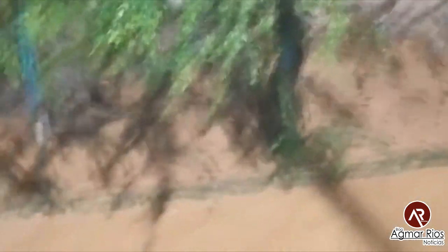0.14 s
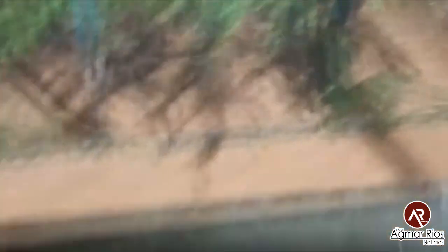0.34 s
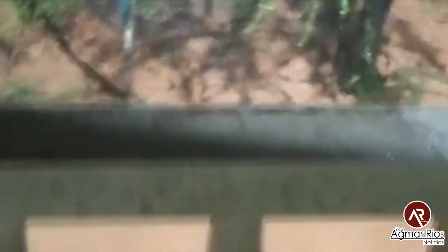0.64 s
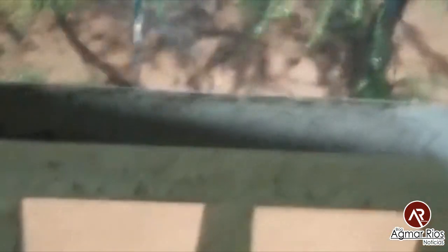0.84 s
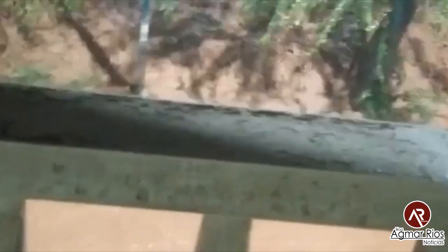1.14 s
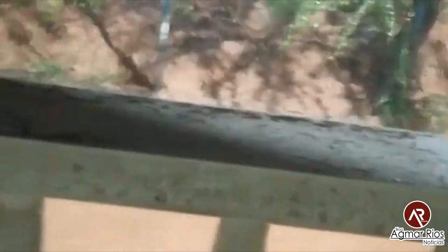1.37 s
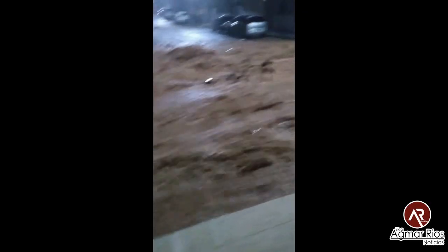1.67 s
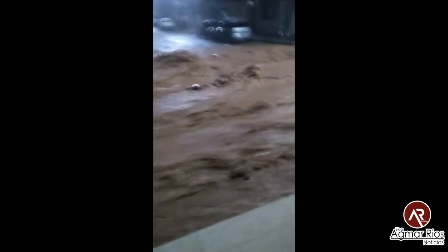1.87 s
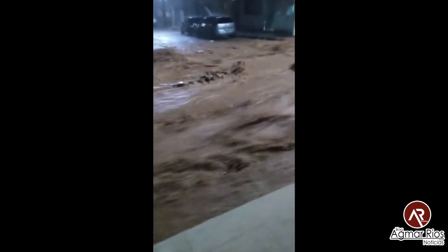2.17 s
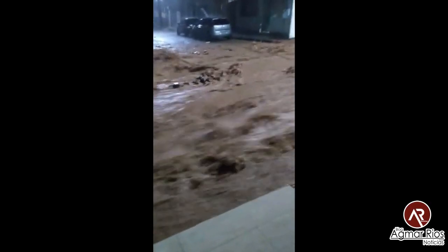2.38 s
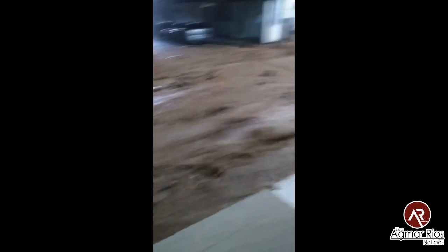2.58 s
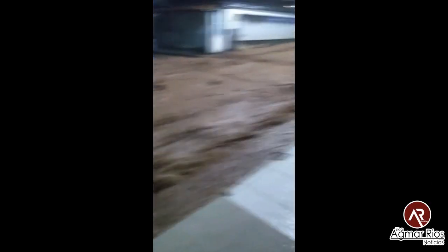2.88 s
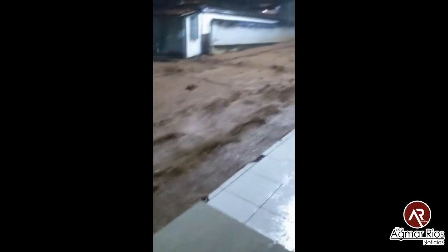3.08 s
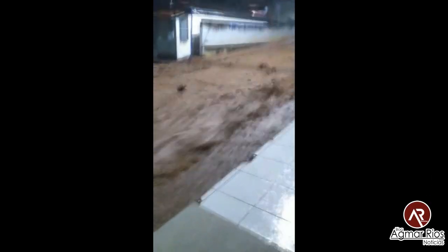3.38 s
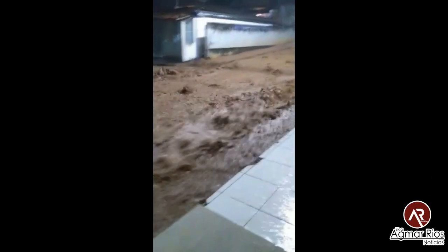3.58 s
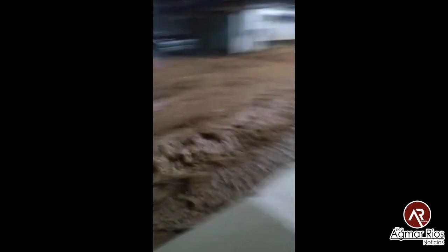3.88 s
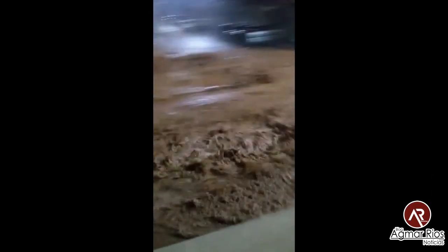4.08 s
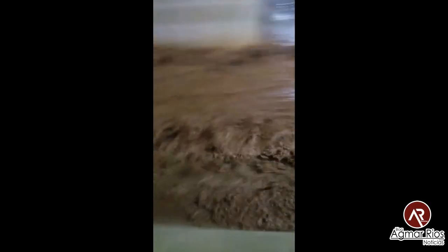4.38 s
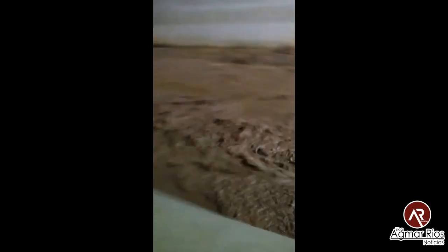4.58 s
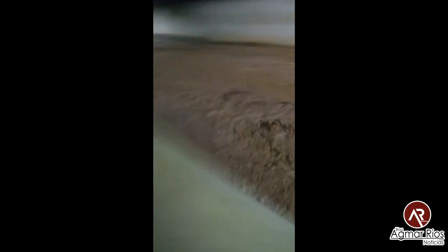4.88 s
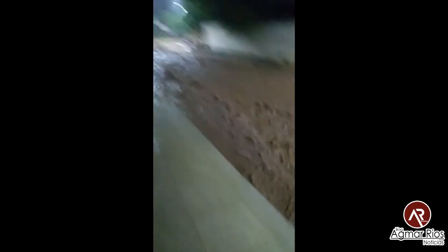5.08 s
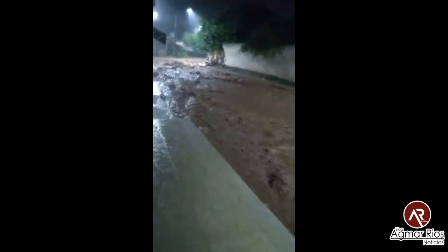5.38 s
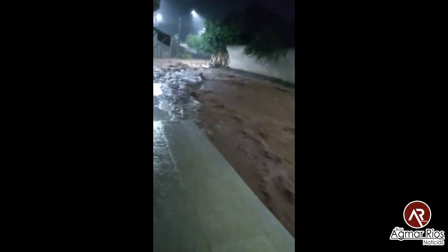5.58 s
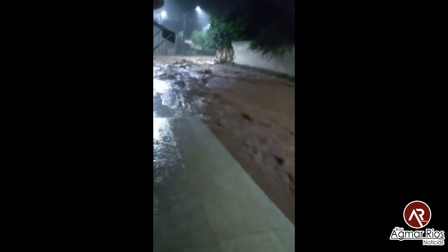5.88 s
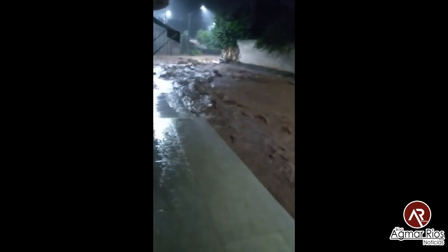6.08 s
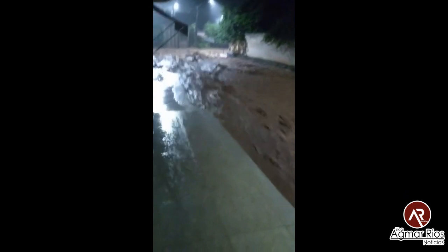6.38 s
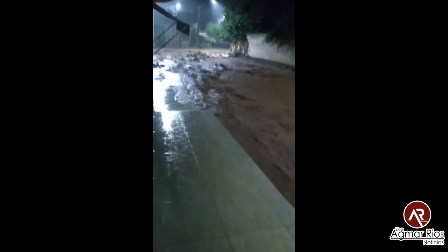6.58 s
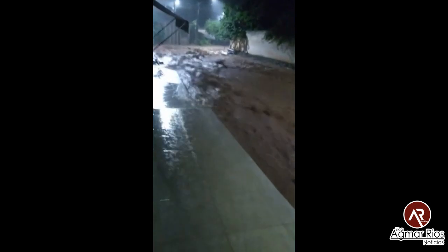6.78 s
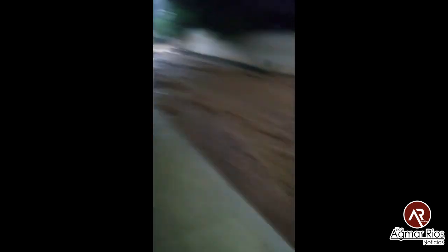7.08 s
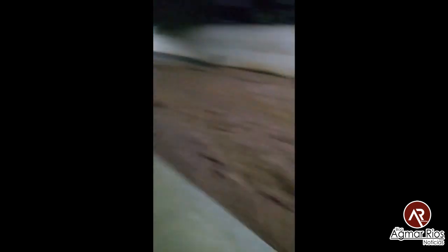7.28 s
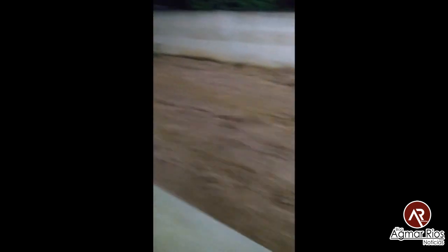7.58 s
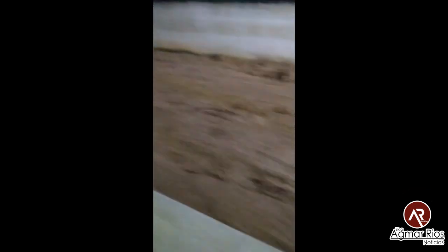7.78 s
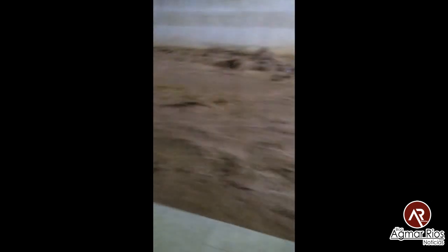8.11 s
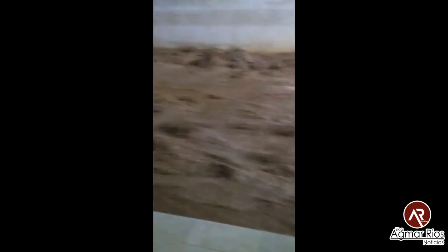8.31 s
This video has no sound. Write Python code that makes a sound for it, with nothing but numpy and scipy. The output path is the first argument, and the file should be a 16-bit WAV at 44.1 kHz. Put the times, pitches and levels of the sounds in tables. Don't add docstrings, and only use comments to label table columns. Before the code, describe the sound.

Outdoor handheld sound in two parts: first a quiet, even wash of dense rain on leaves, wide and grainy; then a hard cut to a much louder flood in a street. The water gives a continuous low-mid roar with splashing, muted spray and irregular hollow gulps. Quick swells roll by, and a couple of bright drop clicks land close on the left, with the automatic level ducking and recovering.

```python
import sys
import numpy as np
from scipy import signal
from scipy.fft import rfft, irfft, next_fast_len
from scipy.io import wavfile

SR = 44100
rng = np.random.default_rng(int(sys.argv[2]) if len(sys.argv) > 2 else 0)


def linear_from_db(decibels):
    return 10 ** (np.asarray(decibels, float) / 20)


def persist_wave(psi):
    counts = np.round(np.clip(psi, -1, 1) * 32767).astype(np.int16)
    wavfile.write(sys.argv[1], SR, np.atleast_2d(counts).T)


N = 372644
TIME = np.arange(N) / SR
CUT_S = 1.677


def rms_one(x):
    return x / np.sqrt(np.mean(x ** 2) + 1e-20)


def columns(rows, at, log=False):
    key, *rest = np.transpose(rows)
    if log:
        key, at = np.log(key + 1), np.log(at + 1)
    return [np.interp(at, key, column) for column in rest]


def drift(rate_hz, size):
    every = 40
    pole = np.exp(-2 * np.pi * rate_hz * every / SR)
    noise = rng.standard_normal(size // every + 1002)
    slow = signal.lfilter([1], [1, -2 * pole, pole * pole], noise)[1000:]
    return np.interp(np.arange(size) / every, np.arange(len(slow)), rms_one(slow))


def uneven_sizes(size, spread_db):
    return linear_from_db(spread_db * np.minimum(rng.exponential(1, (2, size)), 4))


def patter(size, per_s, spread_db, share):
    hit = rng.random((2, size)) < per_s / SR
    impacts = hit * uneven_sizes(size, spread_db) * rng.choice([-1, 1], (2, size))
    smooth = rng.standard_normal((2, size))
    return np.sqrt(1 - share) * smooth + np.sqrt(share) * rms_one(impacts)


def patchy_bands(spectra, size, shared_db, own_db, fast_hz):
    octave = np.log2(np.arange(1, spectra.shape[1] + 1) * SR / size)
    together, neighbour = drift(18, size), drift(fast_hz, size)
    for centre in np.arange(5, 14.1, 1 / 3):
        own = drift(fast_hz, size)
        window = np.cos(np.pi / 2 * np.clip(3 * (octave - centre), -1, 1)) ** 2
        gain_db = shared_db * together + own_db * (own + neighbour) / np.sqrt(2)
        gain_db = gain_db * (0.61 + 0.04 * (centre - 5))
        yield 2 ** centre, linear_from_db(gain_db) * irfft(spectra * window, size)
        neighbour = own


# start_s, level_db
RAIN_LEVEL = [(0.0, -32.5), (0.5, -32.5), (0.78, -33.2), (0.95, -32.5), (1.3, -33.5), (1.66, -32.5)]
# pitch_hz, left_db, right_db (both per Hz)
RAIN_COLOUR = [(30, -17, -5.5), (100, -11.5, -16.5), (175, -3.5, -2), (1570, -1.5, -2), (2180, -3.5, -5.3),
               (3210, -13, -8.5), (6650, -6.5, -7.5), (8540, -15, -3.5), (9200, -28, 1.5),
               (10390, -39, -6.5), (12560, -23.5, -26), (12400, -39.6, -40), (12800, -69, -19.5),
               (14200, -81, -26)]
# pitch_hz, likeness (-1 to 1)
RAIN_ALIKE = [(100, 1), (300, 0.77), (800, 0.47), (1100, -0.25), (1800, -0.0054), (2200, 0.3), (2900, 0.18),
              (3200, -.3), (4500, 0.075)]


def rain():
    size = next_fast_len(int(2 * SR))
    hz = np.arange(size // 2 + 1) * SR / size
    mid, side = rfft(patter(size, per_s=4000, spread_db=5, share=0.22))
    alike = np.clip(columns(RAIN_ALIKE, hz, log=True)[0], -1, 1)
    pair = np.sqrt(1 + alike) * mid + np.sqrt(1 - alike) * side * [[1], [-1]]
    pair = pair * linear_from_db(np.array(columns(RAIN_COLOUR, hz, log=True))) * (hz < 15100)
    sag = linear_from_db(0.5 * (CUT_S / 2 - np.arange(size) / SR))
    bands = patchy_bands(pair, size, shared_db=0.4, own_db=0.8, fast_hz=25)
    out = np.zeros((2, N))
    out[:, :size] = rms_one(sum(band * sag if centre < 400 else band for centre, band in bands))
    return out * linear_from_db(columns(RAIN_LEVEL, TIME)[0] + 11.5) * (TIME < CUT_S)


def ring(clicks, hz, cycles):
    decay, turn = linear_from_db(-60 * hz / (cycles * SR)), 2 * np.pi * hz / SR
    resonator = [1, -2 * decay * np.cos(turn), decay * decay]
    return signal.lfilter([0, np.sin(turn)], resonator, clicks + 1e-18)


def bubbles(size, per_s, cycles):
    clicks = uneven_sizes(size, 5.2) * (rng.random((2, size)) < per_s / SR)
    dealt = rng.integers(0, 12, (2, size))
    rings = np.zeros((2, size))
    for k, hz in enumerate(np.geomspace(180, 1300, 12)):
        rings += ring(clicks * (dealt == k), hz, cycles) * (300 / hz) ** 0.3
    highpass = signal.butter(2, 160, "high", fs=SR, output="sos")
    return rms_one(signal.sosfilt(highpass, rings))


# crest_s, lift_db
SURGES = [(1.83, 0.5), (2.2, 0.5), (2.84, 1.5), (3.15, 2.5), (3.64, 1), (3.82, 1.5), (4.2, 1.5), (4.68, 1),
          (5.13, 1.5), (5.66, 2), (6.07, 2), (6.62, 2.5), (6.93, 0), (7.5, 1.5), (8.18, 0.5)]


def surges(time):
    rise_s, fall_s = 0.065, 0.08
    lift = 0
    for crest_s, lift_db in SURGES:
        width_s = np.where(time < crest_s, rise_s, fall_s)
        lift = lift + lift_db * np.exp(-0.5 * ((time - crest_s) / width_s) ** 2)
    return lift


# start_s, flow_db, depth_db (lift of the 300-520 Hz body)
FLOW = [(1.74, 3, -3), (2.1, 2.45, 0), (2.55, -0.3, -1.5), (3.2, -0.6, 0.5), (3.9, -1.4, 0),
        (4.2, -.5, -1.5), (4.45, -0.4, -1), (4.8, 1, -0.5), (5.35, -1.5, 2), (6.0, -2, 0.2),
        (6.45, -1.6, 2), (7.0, 0.5, 2.5), (7.35, -1, 0), (7.6, 0.46, -0.5), (8.4, 0, -.3)]
# pitch_hz, level_db (per Hz)
FLOOD_COLOUR = [(25, -46), (40, -34), (110, -8), (220, -1.5), (380, -1), (900, -7.5), (2150, -19),
                (2750, -18.5), (3400, -23.5), (4200, -21.5), (5700, -18), (7800, -19), (10000, -26),
                (12000, -28.5), (14000, -33.5)]
TOP_HZ = 14240


def torrent(size):
    roar_top_hz, spray_foot_hz = 2000, 8800
    hz, time = np.arange(size // 2 + 1) * SR / size, np.arange(size) / SR
    white = rfft(patter(size, per_s=2500, spread_db=4, share=0.15))
    coloured = white * linear_from_db(columns(FLOOD_COLOUR, hz, log=True)[0]) * (hz < TOP_HZ)
    flow_db, depth_db = columns(FLOW, time)
    wave_db = surges(time)
    belly, edge = linear_from_db(depth_db), linear_from_db(-0.3 * depth_db)
    layers = np.zeros((3, 2, size))
    for centre, band in patchy_bands(coloured, size, shared_db=0.55, own_db=0.9, fast_hz=30):
        if 290 < centre < 530:
            band = band * belly
        elif 530 < centre < 1100:
            band = band * edge
        layers[int(centre > roar_top_hz) + int(centre > spray_foot_hz)] += band
    roar, splash, spray = layers
    roar = rms_one(roar) + linear_from_db(-13) * bubbles(size, per_s=150, cycles=6.1)

    def driven(layer, level_db, flow_share, wave_share):
        return rms_one(layer) * linear_from_db(level_db + flow_share * flow_db + wave_share * wave_db)

    return driven(roar, -18, 0.94, 0.95) + driven(splash, -25, 0.8, 0.9) + driven(spray, -36, 0.96, 1)


# pitch_hz, sum_floor_db, difference_floor_db
NOTCH_FLOORS = [(1100, -30, -22), (2200, -24, -26), (3300, -22, -24), (4400, -18, -19), (5500, -12, -14),
                (6600, -8, -12), (7700, -6.5, -10), (8900, -5.5, -9.5), (11100, -8, -11),
                (12300, -6.5, -12), (13300, -8.5, -12.5)]
# pitch_hz, share_db
BASS_SIDE = [(40, -2.5), (100, -2), (200, -6.5), (300, -7.5), (500, -5.5), (700, -8.5), (900, -12.5),
             (1110, -19)]
# pitch_hz, in_step, quarter_turn_apart (-1 to 1)
BASS_TIE = [(40, .45, .5), (100, 0.62, 0.57), (191, 0.92, 0), (270, 0.25, -.25), (480, 0.1, 0),
            (600, 0.12, 0.2), (850, .4, -.25), (1110, 0.1, 0.)]
TREBLE_TIE = [(1110, .15, .2), (2000, 0.059, .35), (3900, 0., .35), (6000, .25, .68), (7800, .45, .45),
              (9500, 0.35, .38), (12500, 0.24, .28), (14300, .05, .1)]


def microphone_pair(strands):
    right_lag_s = 19.85 / 44100
    size = strands.shape[1]
    hz = np.arange(size // 2 + 1) * SR / size
    turn = 2 * np.pi * (hz - 110 * np.exp(-hz / 1800)) * right_lag_s
    bass = turn < np.pi
    sum_floor, side_floor = linear_from_db(2 * np.array(columns(NOTCH_FLOORS, hz, log=True)))
    comb_share = side_floor + (1 - sum_floor - side_floor) * np.cos(turn / 2) ** 2
    bass_share = linear_from_db(2 * columns(BASS_SIDE, hz, log=True)[0])
    side_share = np.clip(np.where(bass, bass_share, comb_share), 0, 1)
    low_step, low_quarter = columns(BASS_TIE, hz, log=True)
    high_step, high_quarter = columns(TREBLE_TIE, hz, log=True)
    tie = np.where(bass, low_step + 1j * low_quarter, high_step - 1j * high_quarter * np.sin(turn))
    untied = np.sqrt(np.clip(1 - abs(tie) ** 2, 0, 1))
    first, second = rfft(strands)
    mid = np.sqrt(1 - side_share) * first
    side = np.sqrt(side_share) * (tie * first + untied * second)
    return irfft([mid + side, mid - side], size)[:, :N]


# start_s, drop_db
DUCKS = [
    (1.672, 8),
    (2.42, 1),
    (3.296, 5),
    (4.25, 3),
    (5.05, -0.5),
    (6.105, 2.5),
]


def gain_control():
    attack_s, release_s = 0.003, 0.25
    total_db = 0
    for start_s, drop_db in DUCKS:
        since = np.maximum(TIME - start_s, 0)
        total_db = total_db + drop_db * np.minimum(since / attack_s, 1) * np.exp(-since / release_s)
    return linear_from_db(-total_db)


def flood():
    return microphone_pair(torrent(next_fast_len(N))) * gain_control() * (TIME >= CUT_S)


def strikes(events, cycles, trim_db, right_sign, low_hz, high_hz, late_s, burst_s):
    out, span = np.zeros((2, N)), max(1, round(burst_s * SR))
    band = signal.butter(4, [low_hz, high_hz], "band", fs=SR, output="sos")
    for start_s, peak_db, hz, pan_db in events:
        blow = rng.standard_normal(SR // 10)
        blow = blow * np.exp(-np.arange(len(blow)) / span)
        sound = ring(signal.sosfilt(band, blow), hz, cycles)
        sound = sound / abs(sound).max() * linear_from_db(peak_db + trim_db)
        at = round((start_s + late_s) * SR)
        out[:, at:at + len(sound)] += sound * [[1], [right_sign * linear_from_db(-pan_db)]]
    return out


# start_s, peak_db, pitch_hz, left_over_right_db (on top of a right side held at
GULPS = [(1.8335, -1, 660, -4), (2.417, -5.5, 477, 4), (2.904, -8, 345, 4.0), (3.318, -10, 269, 3),
         (3.652, -2.5, 294, -1), (3.697, -6, 310, 7), (4.252, 1, 334, -3), (4.306, -3.5, 273, 5),
         (5.459, -7, 415, 3.0), (5.804, -1, 376, -4), (6.158, -5.5, 277, -1), (6.657, -4, 372, 2.5),
         (7.002, -10, 380, 0), (7.32, 0, 328, -4)]


def gulps():
    return strikes(GULPS, cycles=11.4, trim_db=-4.5, right_sign=0.45, low_hz=169, high_hz=1500,
                   late_s=0.0015, burst_s=0)


# start_s, peak_db, pitch_hz, left_over_right_db
DROPS = [
    (2.1262, -19, 7800, 3),
    (3.2952, -4, 9000, 12),
    (4.3202, -20, 5500, 2),
    (5.0281, -14, 7800, 3),
    (6.1039, -2.5, 7800, 14),
    (6.1085, -13, 7200, 3),
]


def drops():
    return strikes(DROPS, cycles=5, trim_db=0, right_sign=-1, low_hz=6200, high_hz=12600,
                   late_s=0, burst_s=0.0006)


def scene():
    return rain() + flood() + gulps() + drops()


def sum_difference(pair, back=False):
    return np.array([[1, 0.87], [1, -0.98]]) / np.sqrt(2) @ pair


def coarse_cells(pair, step_db, swing_db):
    window = np.sin(np.pi * (np.arange(2048) + 0.5) / 2048)
    hz, _, cells = signal.stft(pair, SR, window, 2048)
    swing = rng.standard_normal((2, 65, cells.shape[2])).repeat(16, axis=1)[:, :len(hz)]
    swing = (swing + np.roll(swing, 1, axis=2)) / np.sqrt(2)
    step = linear_from_db(np.array(columns(step_db, hz, log=True))[..., None] + swing_db * swing)
    size = abs(cells) + 1e-12
    rounded = cells / size * step * np.floor(size / step + 0.4)
    return signal.istft(rounded, SR, window, 2048)[1][:, :pair.shape[1]]


# pitch_hz, step_db (sum and difference alike)
COARSE_SUM = [(1900, -75), (2300, -53), (3000, -50), (3800, -50), (5000, -49.5), (6800, -48.5), (7800, -75)]
# pitch_hz, left_step_db, right_step_db
COARSE_SIDES = [(7000, -75, -75), (9000, -56, -60), (10500, -58, -50), (11300, -60, -51.5),
                (12250, -57, -51), (12450, -64, -70), (14000, -66, -68), (14700, -66, -60)]


def grainy_rain(pair):
    hiss = sum_difference(coarse_cells(sum_difference(pair), COARSE_SUM, swing_db=6.5))
    return coarse_cells(hiss, COARSE_SIDES, swing_db=4.5)


# pitch_hz, step_db (sum and difference alike)
COARSE_FLOOD = [(700, -70), (1150, -56), (2000, -56), (2400, -52), (3400, -57), (4400, -53), (5500, -58),
                (6600, -56.5), (8900, -58.5), (10000, -62), (11100, -58.5), (12200, -66), (12900, -66),
                (13400, -63), (14300, -72)]


def grainy_flood(pair, gain):
    return gain * sum_difference(coarse_cells(sum_difference(pair) / gain, COARSE_FLOOD, swing_db=3))


def low_pass(x):
    return signal.sosfilt(signal.butter(12, 15310, fs=SR, output="sos"), x)


def record(dry):
    end = round(CUT_S * SR)
    gain = gain_control()[end:] * linear_from_db(-0.76)
    mix = np.hstack([grainy_rain(dry[:, :end]), grainy_flood(dry[:, end:], gain)])
    return low_pass(mix)


dry = scene()
out = record(dry)
persist_wave(out)
```